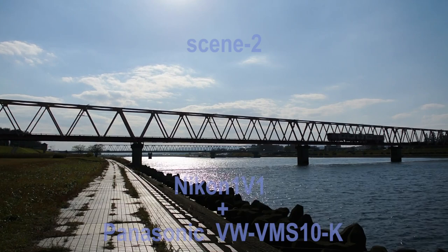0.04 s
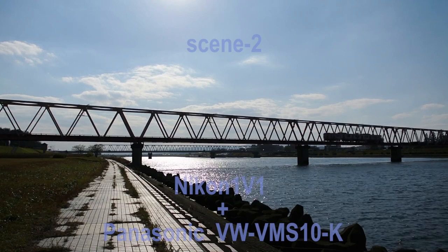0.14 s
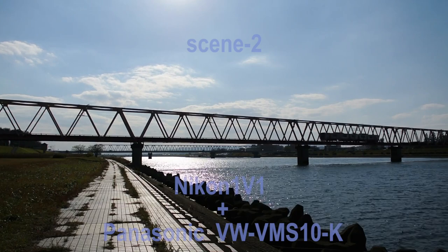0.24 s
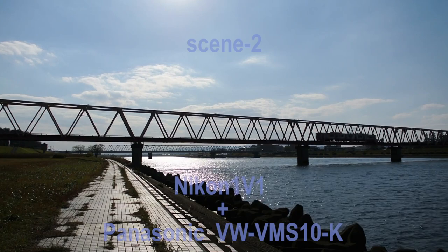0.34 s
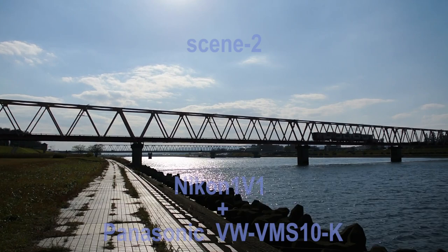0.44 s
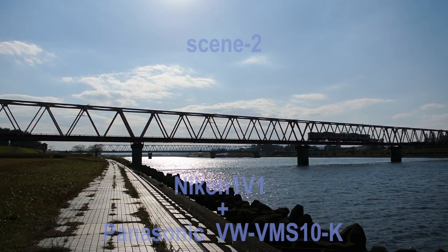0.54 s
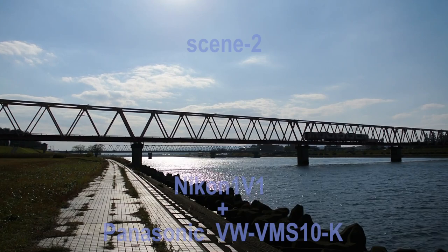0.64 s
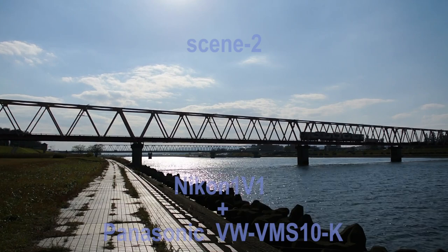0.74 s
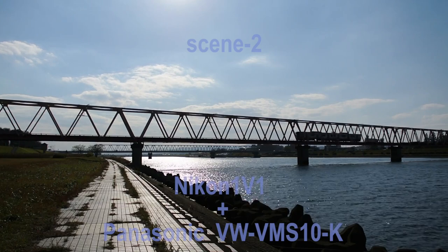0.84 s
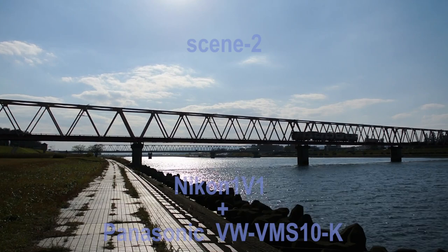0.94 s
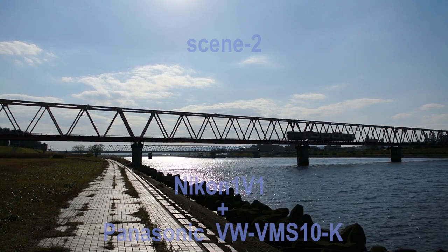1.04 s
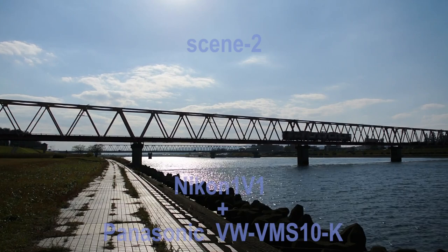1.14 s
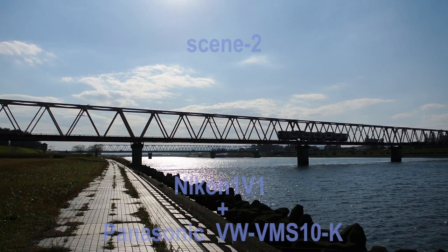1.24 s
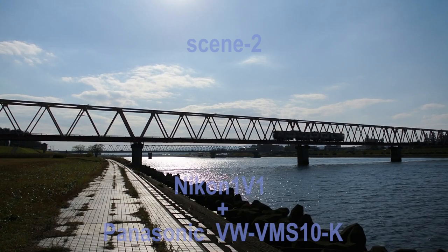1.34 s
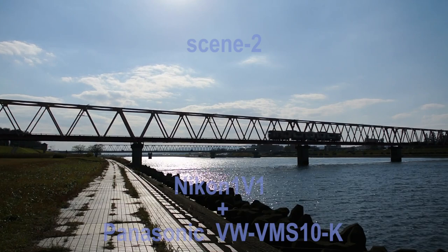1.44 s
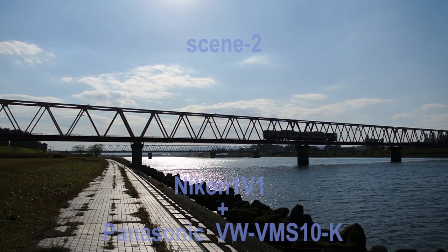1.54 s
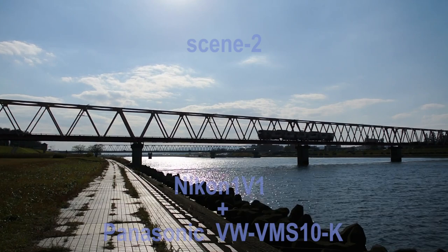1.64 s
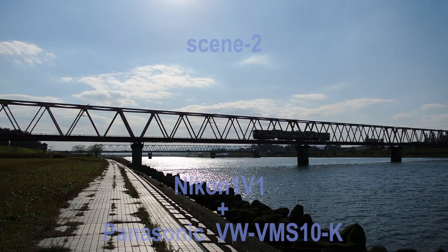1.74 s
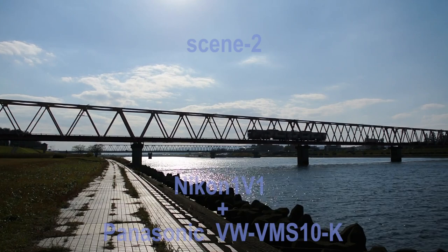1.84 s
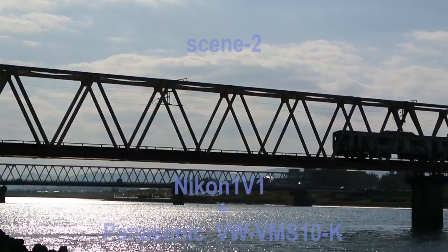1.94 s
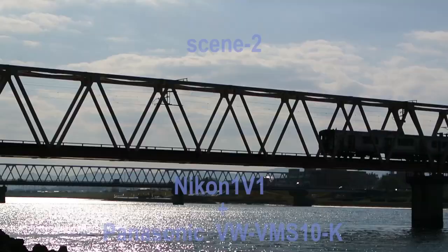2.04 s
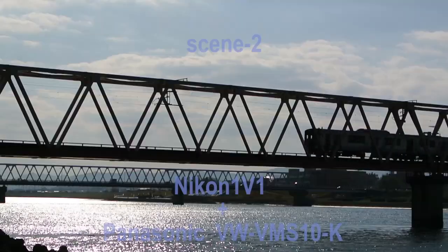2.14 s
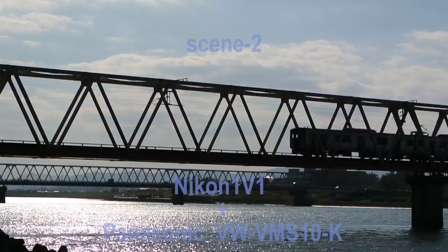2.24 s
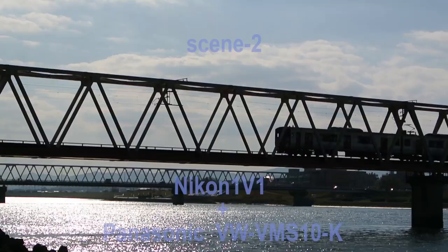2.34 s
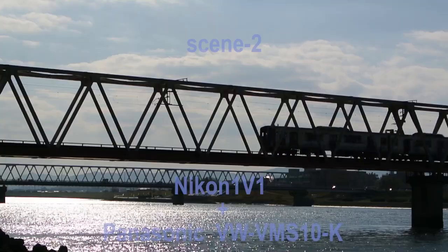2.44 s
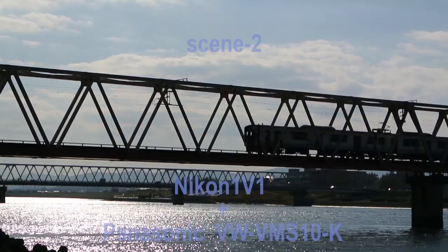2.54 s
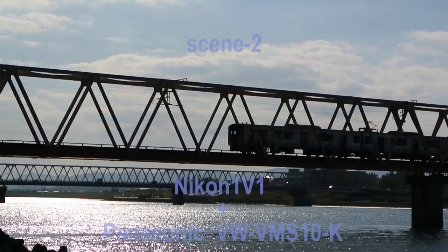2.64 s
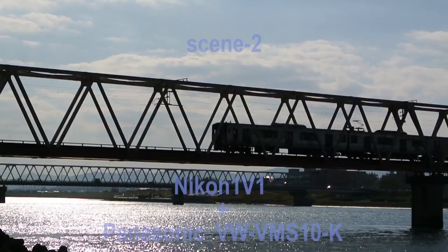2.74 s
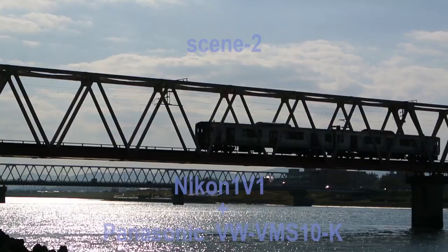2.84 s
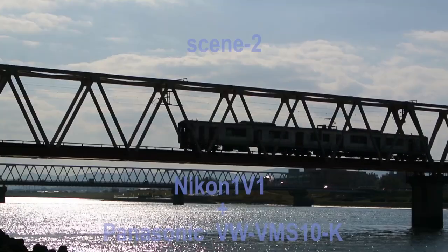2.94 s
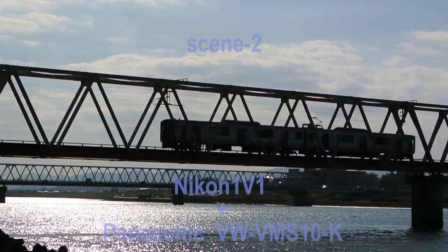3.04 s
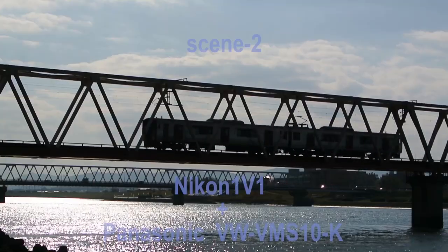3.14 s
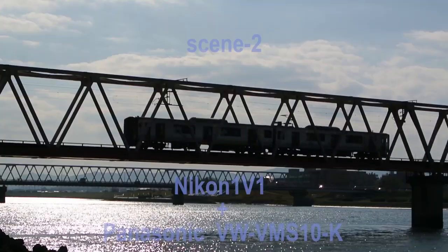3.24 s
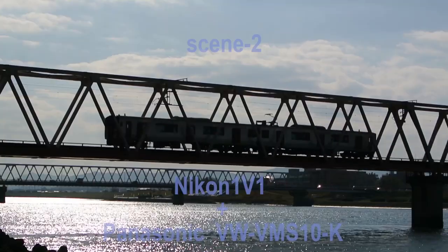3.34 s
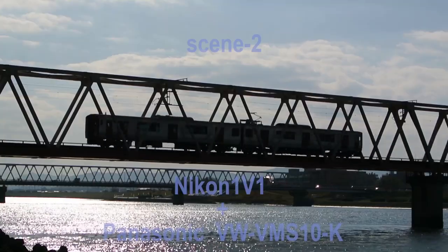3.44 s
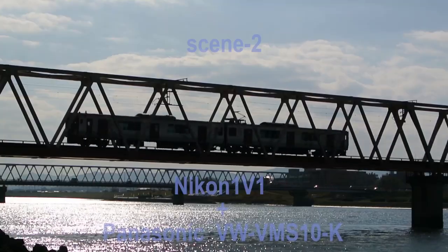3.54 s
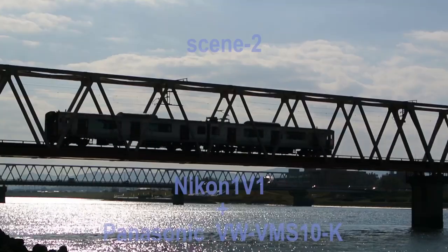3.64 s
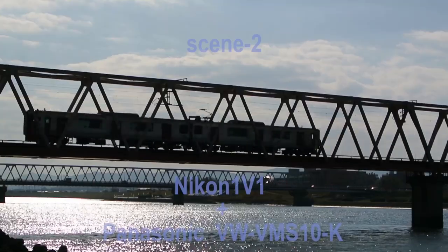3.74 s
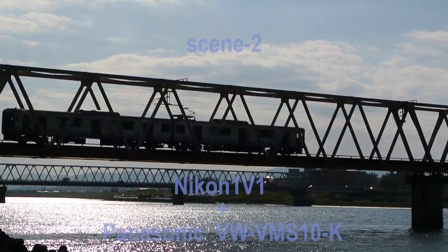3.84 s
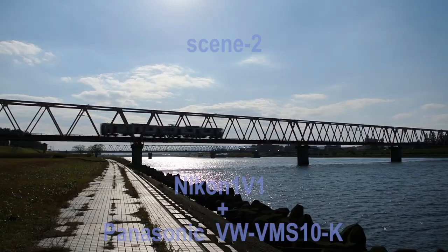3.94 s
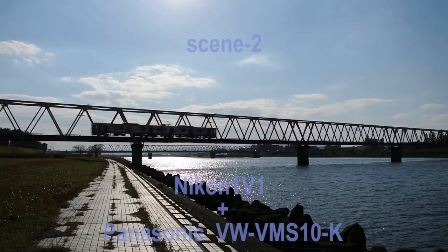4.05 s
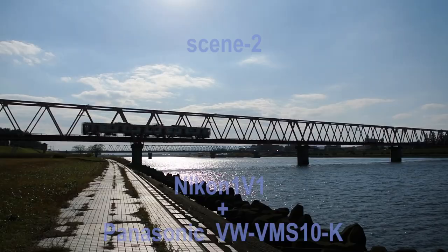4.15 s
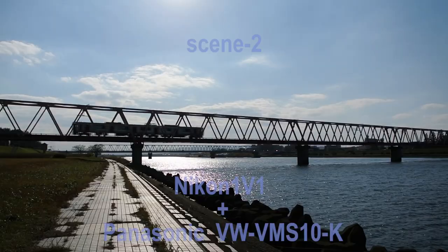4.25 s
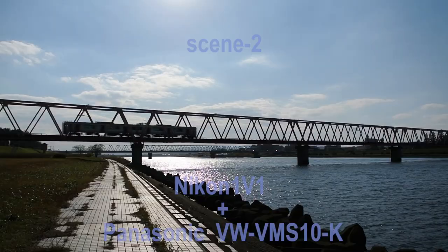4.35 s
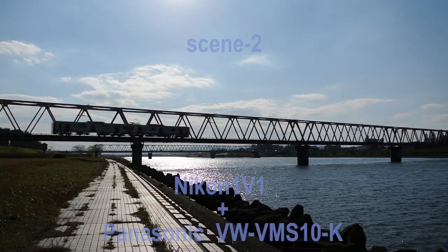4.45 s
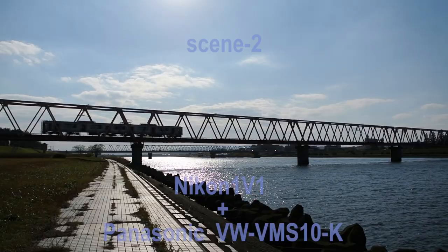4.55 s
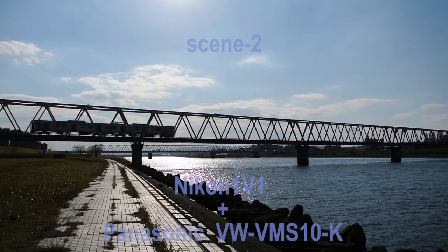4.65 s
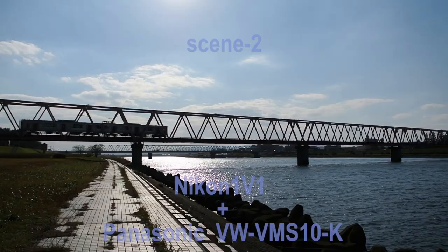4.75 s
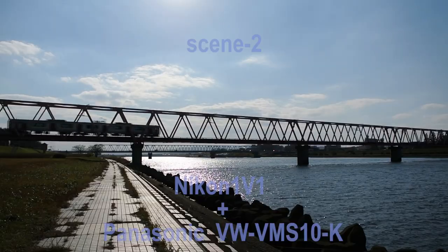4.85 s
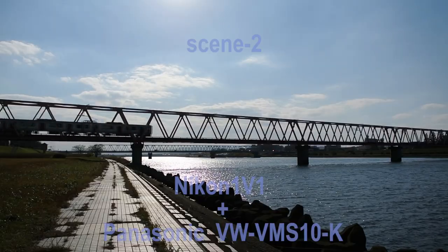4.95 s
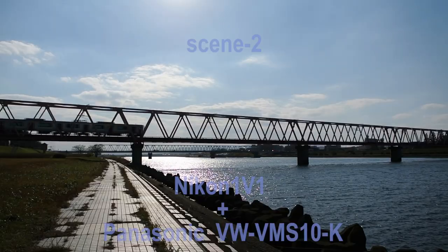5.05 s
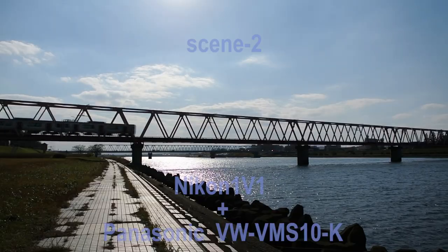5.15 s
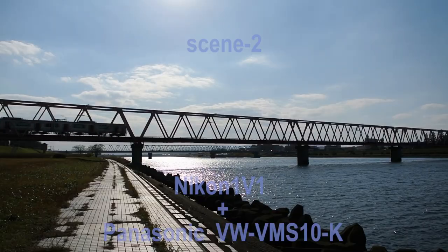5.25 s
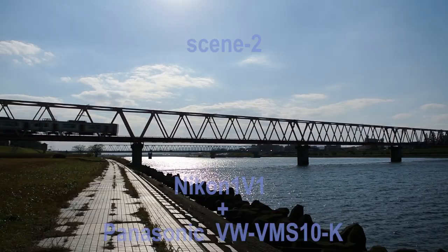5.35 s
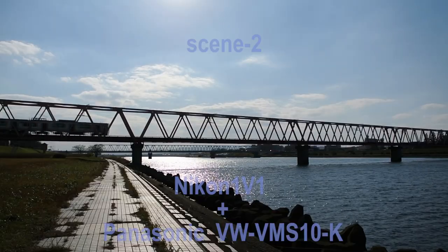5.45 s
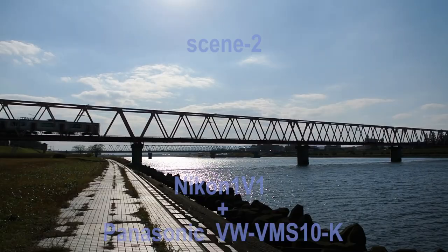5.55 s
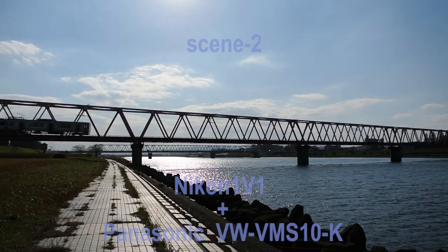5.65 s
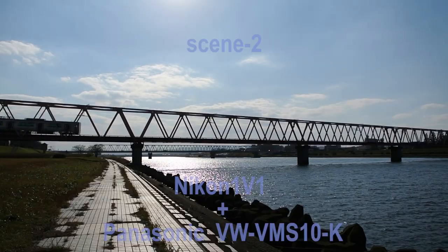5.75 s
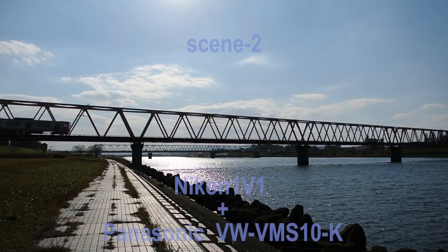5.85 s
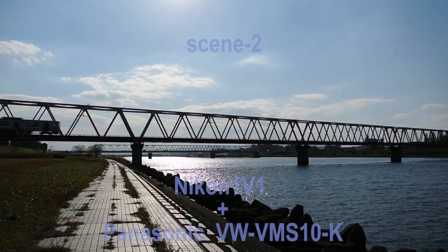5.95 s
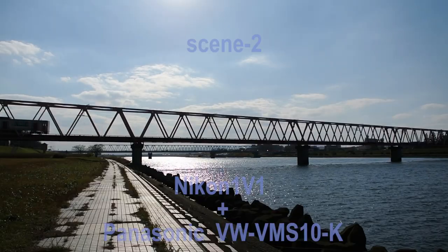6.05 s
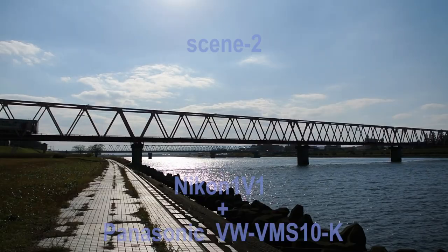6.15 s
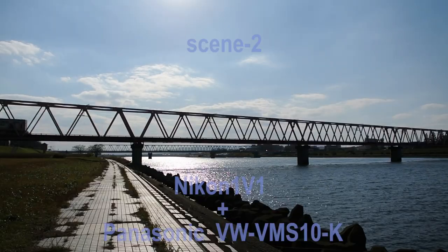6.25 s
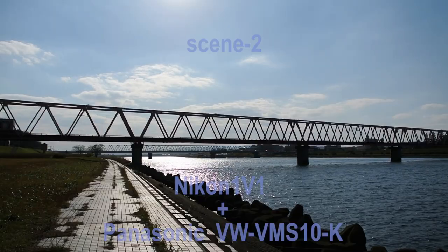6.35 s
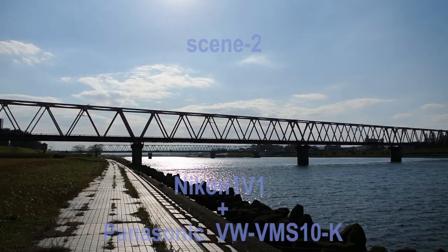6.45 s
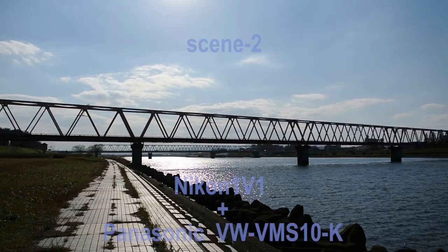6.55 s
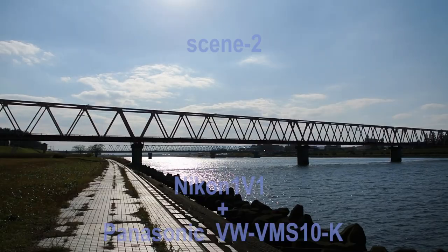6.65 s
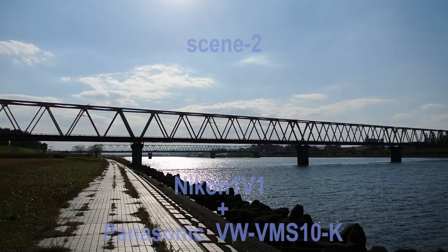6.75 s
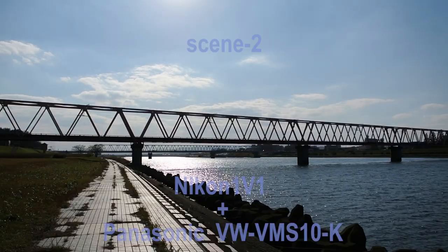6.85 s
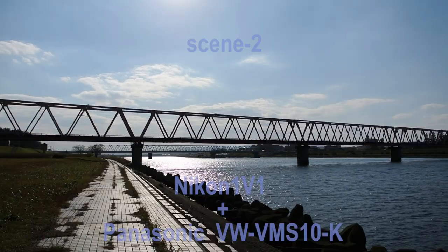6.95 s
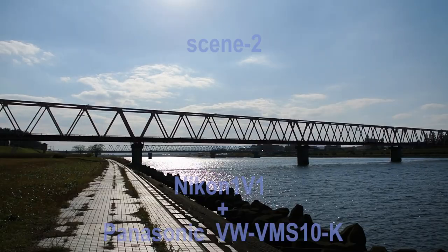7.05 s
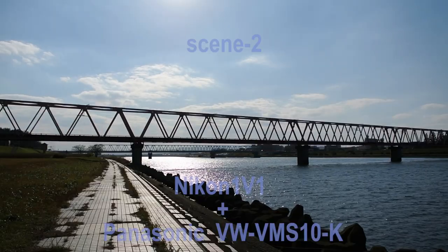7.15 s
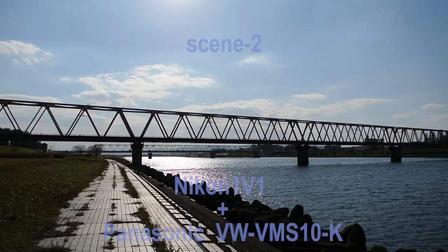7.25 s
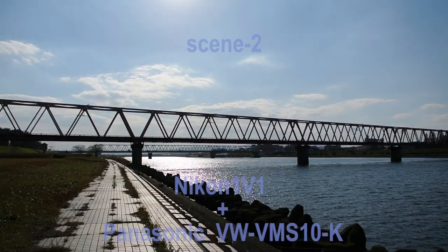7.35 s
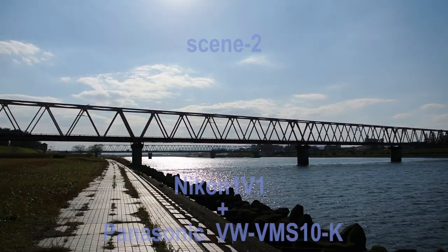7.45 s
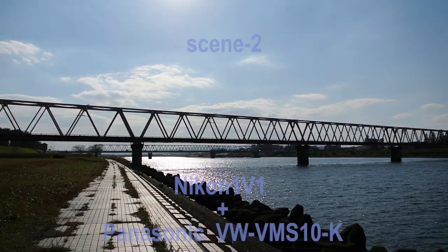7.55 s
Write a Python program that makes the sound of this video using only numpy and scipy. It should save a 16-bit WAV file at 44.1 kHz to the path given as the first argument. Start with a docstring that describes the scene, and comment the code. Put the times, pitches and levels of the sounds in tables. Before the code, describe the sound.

A stereo microphone on an open riverbank hears a short electric train on an iron bridge. Dense clanking comes in overlapping clusters nearly every second, blurred and midrange at first, then crisper with more body. Wheels ring briefly and squeal thinly, barely audible. The sound travels from right to left; the last knocks decay into thinner rolling noise, soft hiss and very faint wind.

```python
"""A two-car train crosses a steel truss bridge from right to left, drawing nearer to a stereo microphone.
It gathers speed; eight axles strike the rail joints and excite banded noise in the steelwork,
a dense clatter that dies away, while the rolling drones in the girders.
The wheel discs ring as damped modes, thin wavering tones sing; one very short click, as of an overloaded peak.
Behind lie a faint hiss and a light breeze, noise filtered separately left and right."""
import sys
import numpy as np
from scipy import signal
from scipy.fft import rfft, irfft, next_fast_len
from scipy.io import wavfile
from scipy.ndimage import uniform_filter1d

SR = 44100
rng = np.random.default_rng(int(sys.argv[2]) if len(sys.argv) > 2 else 0)


def materialize(psi):
    """Save the field psi as 16-bit PCM at rate SR to the path in sys.argv[1].

    A 1-D psi becomes a single channel; in a 2-D psi each row is a channel.
    """
    bounded = np.clip(np.atleast_2d(psi).T, -1, 1)
    quanta = np.round(bounded * 32767).astype(np.int16)
    wavfile.write(sys.argv[1], SR, quanta)


def ratio(d):
    """dB to gain"""
    e = np.asarray(d, float) / 20
    return 10 ** e


N = 334719
STEP = 64  # samples per envelope point

# All levels are relative: colour, strike, distance and panning combine with them.
# Middle of the hum, boom, girder, rail and hiss ranges: [f/Hz]
RANGE_HZ = (95, 250, 760, 1900, 3800)
# Limits of the same five ranges: [lower f/Hz, upper f/Hz]
RANGE_EDGES_HZ = [(60, 130), (150, 400), (400, 1300), (1300, 3000), (3000, 9000)]
# Rolling drone: [t/s, girder level/dB, deck hum level/dB, treble level/dB]
ROLLING = [(0, -27, -52, -52), (.12, -21.5, -49, -49.5), (.3, -23, -47, -52), (.9, -26, -48, -51.5),
           (1.4, -25, -46, -47.5), (1.9, -26.5, -49, -48), (2.35, -22.5, -45, -47), (2.8, -23, -45, -44.5),
           (3.3, -23, -45, -43.5), (3.75, -23.5, -44, -42.5), (4.2, -23, -46, -40.5), (4.5, -23, -47, -42),
           (4.7, -24.5, -47, -44), (5.1, -25.5, -46, -41), (5.6, -25, -47, -42), (6.05, -27.5, -48, -40),
           (6.5, -27, -44, -39.5), (6.85, -27, -41, -38), (7.1, -29, -38, -40), (7.35, -34, -46, -47),
           (7.59, -38, -44, -50)]
BOOM_FAR_DB, BOOM_NEAR_DB = -14, -5.8  # boom against the girders
RAIL_DB = 1.5  # rail against the mean of girders and treble

# Colour of the bridge while the train is far: [f/Hz, level/dB per Hz]
STEEL_FAR = [(18, -82.5), (30, -59), (53, -40), (88, -22.5), (140, -26), (182, -13.5), (243, -15),
             (341, -15), (505, -4), (945, -1), (1870, -14.5), (2180, -19.5), (2490, -23), (7080, -49),
             (15500, -79.5)]
# Colour of the bridge once the train is near: [f/Hz, level/dB per Hz]
STEEL_NEAR = [(18, -72), (30, -44), (42, -39), (83, -18), (190, -8), (277, -0.5), (420, -1), (575, 0),
              (970, -1), (1590, -5), (2360, -8.5), (3490, -16.5), (4310, -18.5), (7860, -33), (15500, -60)]
# Approach of the train: [t/s, nearness from 0 far to 1 near]
NEARNESS = [(0, 0.), (2, 0.19), (4, 0.5), (5.5, 1), (7.59, 1.05)]
# Resonances and gaps of the steelwork, the deck first: [f/Hz, width/Hz, level/dB]
MEMBERS = [(95, 6, 7), (580, 40, 2), (795, 50, 3), (985, 50, 1), (1250, 120, -.5), (2365, 40, 3),
           (2440, 45, 4), (2760, 150, -1.5), (3080, 45, 3), (3175, 40, 3), (3355, 40, 2.5), (3950, 70, 1),
           (4390, 50, 1), (4750, 150, -.7), (5480, 40, 2.5), (5710, 50, 2.5)]
# Plateau of close rail resonances: [f/Hz, half width/Hz, level/dB]
RAIL_PLATEAU = (4250, 480, 1.0)
AIR_LOSS_HZ = 12500  # the air takes 6 dB from the bridge here, more above

# Rail joints: [t/s of the first axle, girder, boom, rail and clack level/dB, arrival spread/s]
JOINTS = [(-1.278, -23, -38, -35, -53.5, .02), (-0.388, -19, -33, -25, -43, .035),
          (0.577, -15, -31, -19.5, -37, .08), (1.532, -13, -31, -20, -34.5, .058),
          (2.463, -9.5, -25.5, -14, -27, .07), (3.403, -11.5, -30, -16.5, -28, .05),
          (4.343, -14.5, -21, -20.5, -27.5, .025), (5.289, -17.5, -28, -17.5, -22, .003),
          (6.198, -21, -34, -24.5, -27.5, .025)]
# Axle positions: [distance behind the first axle/m]
AXLES_M = (0, 2.1, 13.8, 15.9, 20, 22.1, 33.8, 35.9)
SPEED_M_S, ACCELERATION_M_S2 = 23.5, .34  # speed at 0 s and its growth
HUM_BLOW_DB = -60
# Force of the eight axles, one row per joint: [level/dB for each axle]
STRIKES_DB = [(0, 0, 0, 0, 0, 0, 3, -2), (0, 0, 0, -3, 2, 1, -1, 0), (-1, -1, 1, 1, 0, 1, -1, 0),
              (3, 0, -1, -4, 0, 2, 2, 0), (-1, -1, 1, 1, 1, 0, 1, -2), (2, 0, 2, -3, 2, -1, 1, -3),
              (-2, -3, 1, 1, 1, 0, 1, 1), (0, -1, 1, 0, 1, -1, 0, 2), (-3, 1, 1, 0, -1, 2, 0, 0)]
# Brightness of each strike in the rail and hiss ranges, one row per joint: [level/dB for each axle]
BITE_DB = [(0, 0, 0, 0, 0, 0, 1, 1), (0, 0, -1, 2, 2, -1, 0, 0), (-1, -1, 0, 0, -1, -2, 0, -1),
           (-2, 0, 0, 2, 1, 1, -1, 0), (1, 1, 0, 1, 1, 2, 1, 1), (1, 2, -2, 1, 1, 0, 0, 0),
           (-2, 0, 0, -1, -1, -1, -2, -1), (0, 3, 0, -1, 0, 2, -1, -4), (1, 0, -1, -1, -1, -2, 0, 0)]
# Extra boom of each strike, one row per joint: [level/dB for each axle]
THUD_DB = [(0, 0, 0, 0, 0, 0, 0, 0), (0, 0, 1, 1, 1, 1, -1, 0), (1, 1, 0, 0, -1, 0, 0, 0),
           (0, 0, 0, 0, 0, 0, 0, 1), (0, 0, 0, 1, 2, 1, 0, 0), (1, 1, -1, -1, -1, -1, 1, 1),
           (-2, -1, 1, 1, 2, 2, -1, 0), (2, 2, 0, 0, 1, 1, 0, 0), (1, 1, 0, 0, 0, 0, -2, 0)]
# Spectral tilt of each strike about the girder range, one row per joint: [dB per octave for each axle]
TILT_DB = [(0, 0, 0, 0, 0, 0, 0, 0), (0, 0, 1, 1, 0, 0, 0, 0), (0, 0, 0, 0, -1, 0, -1, -1),
           (0, 0, 0, 0, 0, 0, 0, 0), (0, 0, 0, 0, 1, 1, 1, 1), (1, 1, 1, 1, 1, 0, -1, -1),
           (-1, -2, 0, -1, -1, -1, -2, -1), (0, 0, 0, 0, 1, 1, 2, 2), (0, 0, 0, 0, 1, 1, 0, 0)]

# Dying of a blow in the trusses, before the bend: [f/Hz, t60/s]
RING_T60 = [(250, 1.0), (750, 0.66), (1900, 0.39), (4200, 0.35), (9000, 0.44)]
RING_BEND = 1.3  # above 1 the clatter holds a moment and then drops away
# Far trusses that ring on more softly: [f/Hz, level/dB]
TAIL = [(400, -20), (1000, -14), (2500, -9), (5000, -10), (9000, -12)]
TAIL_STRETCH = 2.5  # times the unbent decay
# First crack of a blow, weaker when arrivals spread: [f/Hz, level/dB]
CRACK = [(700, -8), (1500, -2), (2500, 1), (4200, 2), (5500, -5), (9000, -14)]
CRACK_T60_S, CRACK_BLUR_S = .06, .012
# A blow is duller at the top than the rolling: [f/Hz, level/dB]
BLOW_DULL = [(4500, 0), (10000, -5), (14000, -11)]

# Modes of the wheel discs: [f/Hz, level/dB, t60/s]
WHEEL_MODES = [(795, 6, .3), (985, 5, .25), (1290, 3, .2), (1600, 0, .2), (2160, -14, .5), (2365, -2, .3),
               (2440, 1, .3), (2640, -14, 0.45), (3080, -4, 0.24), (3175, -3, .5), (3355, -5, 0.4),
               (3770, 2, .15), (3950, 2, .2), (4130, 1, .15), (4390, 3, 0.2), (4510, 0, .15),
               (4620, -1, .2)]
WHEEL_DB = -15.5
# Faint singing of a wheel on the rail: [t/s, length/s, f/Hz, level/dB]
SINGING = [(2.58, .32, 3182, -52), (5.12, .28, 3200, -47), (6.3, .28, 3160, -56), (7.16, .33, 3202, -56)]
# Left-right likeness of the bridge: [f/Hz, likeness from 0 to 1]
ALIKE = [(60, 0.6), (130, 1), (290, 0.85), (640, 0.97), (1400, 1), (3100, 0.86), (6800, 0.62), (12000, 0.2)]
# Position of the train: [t/s, left minus right level/dB]
PAN = [(0, -7), (2, -3.8), (4, .3), (5.5, 5), (7.59, 11)]
# Share of the panning, the capsules pointing less in the bass: [f/Hz, share]
PAN_SHARE = [(100, 0.22), (500, 1.04), (2000, 0.9), (4000, .72), (8000, 0.65)]

CLICK_S, CLICK_DB = 5.294, -21
# Shape of the hiss spectrum: [f/Hz, level/dB per Hz]
HISS = [(2940, -27), (5000, -3), (6940, -15), (9680, -10.5), (13600, -14.5), (15100, -28), (15600, -31)]
HISS_DB = -65.5  # rms
# Shape of the breeze spectrum: [f/Hz, level/dB per Hz]
BREEZE = [(10, 0.5), (30, -4.5), (60, -5), (200, -31), (1000, -64)]
BREEZE_DB = -70  # rms
RIGHT_LAG = 2  # samples


def bridge():
    """Forced vibration: third-octave slices of rattling steel follow the power of rolling and blows."""
    size = next_fast_len(N)
    hz = np.arange(1, size // 2 + 2) * SR / size
    far, near = steel_colours(hz)
    far_db, near_db = range_levels(hz, far), range_levels(hz, near)
    mid, side = (rfft(rattle(1200, 2.2, 0.27), size) * np.sqrt(size / 2) * far for _ in range(2))

    t = np.arange(0, N + STEP, STEP) / SR
    nearness = np.interp(t, *np.transpose(NEARNESS))
    rolling_db = rolling(t, nearness)
    start, blow_db, spread, tilt_db = blows()
    age = np.maximum(t - start[:, None], 0)
    sway = walk(2.2, len(t))
    out = np.zeros((2, N))
    for centre in 31 * 2 ** (np.arange(28) / 3):
        # share of each of the five ranges in this slice
        weight = np.array([along(list(zip(RANGE_HZ, row)), centre) for row in np.eye(len(RANGE_HZ))])
        lift_db = weight[2] * np.log2(centre / RANGE_HZ[2]) * tilt_db
        strike_db = weight @ blow_db + lift_db + along(BLOW_DULL, centre)
        power = ratio(2 * weight @ rolling_db) + ratio(2 * strike_db) @ truss_ring(age, spread, centre)

        # the colour shifts as the air path shortens
        shift_db = along(STEEL_NEAR, centre) - along(STEEL_FAR, centre) - weight @ near_db + weight @ far_db
        flicker_db = .5 * sway + 1.3 * walk(8.6, len(t))
        gain = np.sqrt(power) * ratio(nearness * shift_db + flicker_db - weight @ far_db)

        band = np.cos(np.pi / 2 * np.clip(3 * np.log2(hz / centre), -1, 1)) ** 2
        alike = along(ALIKE, centre)
        common = np.sqrt((1 + alike) / 2) * irfft(mid * band)[:N]
        opposite = np.sqrt((1 - alike) / 2) * irfft(side * band)[:N]
        pair = common + opposite * np.array([[1], [-1]])
        out += pan(pair, along(PAN_SHARE, centre)) * np.interp(np.arange(N) / SR, t, gain)
    return out


def blows():
    """Uniform acceleration: each axle's arrival at each joint, its range levels, arrival spread and tilt."""
    first, girder, boom, rail, clack, spread = np.transpose(JOINTS)[:, :, None]
    speed = SPEED_M_S + ACCELERATION_M_S2 * first
    passing = np.sqrt(speed ** 2 + 2 * ACCELERATION_M_S2 * np.array(AXLES_M))
    start = first + (passing - speed) / ACCELERATION_M_S2
    db = np.array([HUM_BLOW_DB + 0 * boom, boom, girder, rail, clack]) + STRIKES_DB
    db[-2:] += BITE_DB
    db[1] += THUD_DB
    heard = (start > 0) & (start < N / SR)
    return start[heard], db[:, heard], (spread + 0 * start)[heard], np.array(TILT_DB)[heard]


def truss_ring(age, spread, hz):
    """Damped decay: the power of every blow is a truss ring, a longer tail and a first crack."""
    # sound from far members arrives later, so a blow builds up before it dies
    rise = 1 - np.exp(-age / spread[:, None])
    dying = 2 * np.log(1000) * age / along(RING_T60, hz)
    ring = np.exp(-dying ** RING_BEND)
    tail = ratio(2 * along(TAIL, hz)) * np.exp(-dying / TAIL_STRETCH)
    crack_dying = 2 * np.log(1000) * age / CRACK_T60_S
    crack = ratio(2 * along(CRACK, hz)) * np.exp(-crack_dying - spread[:, None] / CRACK_BLUR_S)
    return rise * (ring + tail + crack)


def rolling(t, nearness):
    """Continuous excitation: rolling levels in the hum, boom, girder, rail and hiss ranges (dB)."""
    s, *levels = np.transpose(ROLLING)
    girder, hum, hiss = (np.interp(t, s, level) for level in levels)
    boom = girder + BOOM_FAR_DB + nearness * (BOOM_NEAR_DB - BOOM_FAR_DB)
    rail = (girder + hiss) / 2 + RAIL_DB
    return np.array([hum, boom, girder, rail, hiss])


def steel_colours(hz):
    """Resonance and absorption: far and near steel spectra with member peaks and treble loss in the air."""
    deck_db = sum(db / (1 + (2 * (hz - f) / width) ** 2) for f, width, db in MEMBERS)
    centre, half_width, plateau_db = RAIL_PLATEAU
    deck_db += plateau_db / (1 + ((hz - centre) / half_width) ** 8)
    loss_db = -6.0 * (hz / AIR_LOSS_HZ) ** 4
    return [ratio(along(colour, hz) + deck_db + loss_db) for colour in (STEEL_FAR, STEEL_NEAR)]


def range_levels(hz, colour):
    """Energy summation: the level of a spectrum within each of the five ranges (dB)."""
    return [10 * np.log10(np.sum(colour[(hz > lo) & (hz < hi)] ** 2)) for lo, hi in RANGE_EDGES_HZ]


def rattle(per_s, spread_db, share):
    """Random impacts: noise with a share of sparse uneven clicks, loose steel parts knocking."""
    size = rng.standard_normal(N) * ratio(spread_db * rng.exponential(size=N))
    clicks = (rng.random(N) < per_s / SR) * size
    return np.sqrt(1 - share) * rng.standard_normal(N) + np.sqrt(share) * unit(clicks)


def wheels():
    """Modal ringing: a 12 ms push from every blow excites each damped disc mode by another amount."""
    start, blow_db = blows()[:2]
    out, soft = np.zeros(N), np.hanning(int(.012 * SR))
    rail_db, clack_db = blow_db[-2:]
    at = (start * SR).astype(int)[:, None] + np.arange(len(soft))
    share = rng.uniform(-1, 1, (len(at), len(WHEEL_MODES)))
    for k, (hz, db, t60) in enumerate(WHEEL_MODES):
        # low modes follow the rail level, high ones the clack
        rail_weight = along(list(zip(RANGE_HZ[-2:], (1, 0))), hz)
        size = ratio(rail_weight * (rail_db - clack_db) + clack_db + db) * share[:, k]
        carrier = np.exp(2j * np.pi * hz / SR * np.arange(len(soft)))
        push = np.zeros(N + len(soft), complex)
        np.add.at(push, at, size[:, None] * soft / soft.sum() * carrier)
        pole = np.exp(2j * np.pi * hz / SR - np.log(1000) / (t60 * SR))
        out += signal.lfilter([1], [1, -pole], push[:N]).imag
    return ratio(WHEEL_DB) * out


def singing():
    """Sustained oscillation: thin sine tones of randomly wavering phase swell and fade."""
    out = np.zeros(N)
    for start, length, hz, db in SINGING:
        at, n = int(start * SR), int(length * SR)
        waver = np.cumsum(rng.standard_normal(n)) * .02
        tone = np.sin(2 * np.pi * hz / SR * np.arange(n) + waver)
        out[at:at + n] += ratio(db) * 2 * np.hanning(n) ** .5 * tone
    return out


def pan(x, share=1):
    """Level-difference stereo: opposite gains move the train from right to left."""
    pan_db = np.interp(np.arange(N) / SR, *np.transpose(PAN))
    return x * ratio(share * np.array([pan_db, -pan_db]) / 2)


def click():
    """Damped oscillation: one very short click, as of an overloaded peak, a fast-decaying 7 kHz cosine."""
    out = np.zeros(N)
    age = np.arange(200) / SR
    at = int(CLICK_S * SR)
    out[at:at + len(age)] = ratio(CLICK_DB) * np.exp(-age / .00004) * np.cos(2 * np.pi * 7000 * age)
    return out


def air():
    """Incoherent noise: smooth hiss and a light breeze on the capsules, unrelated left and right."""
    return ratio(HISS_DB) * coloured_noise(HISS) + ratio(BREEZE_DB) * coloured_noise(BREEZE)


def coloured_noise(colour):
    """Spectral filtering: two independent channels of white noise take the given colour at rms 1."""
    hz = np.arange(1, N // 2 + 2) * SR / N
    return unit(irfft(rfft(rng.standard_normal((2, N))) * ratio(along(colour, hz)), N))


def walk(rate, count):
    """Low-pass fluctuation: noise averaged twice drifts slowly with rms 1."""
    k = int(SR / STEP / rate)
    return unit(uniform_filter1d(uniform_filter1d(rng.standard_normal(count), k), k))


def along(table, hz):
    """Logarithmic pitch scale: a (Hz, value) table is read on a log-frequency axis."""
    f, v = np.transpose(table)
    return np.interp(np.log(hz), np.log(f), v)


def unit(x):
    """Power normalisation: the signal is scaled to rms 1."""
    return x / np.sqrt(np.mean(x ** 2))


def scene():
    """Superposition: bridge, wheels, click and air add linearly."""
    return bridge() + pan(wheels() + singing()) + click() + air()


def low_pass(x):
    """Removes everything above the highest recorded frequency."""
    return signal.sosfilt(signal.butter(12, 15710, fs=SR, output="sos"), x)


def record(dry):
    """Delay and saturation: the right channel comes slightly late and the preamp rounds the loudest peaks."""
    x = np.array([dry[0], np.roll(dry[1], RIGHT_LAG)])
    mix = np.tanh(.98 * x)
    return low_pass(mix)


dry = scene()
out = record(dry)
materialize(out)
```